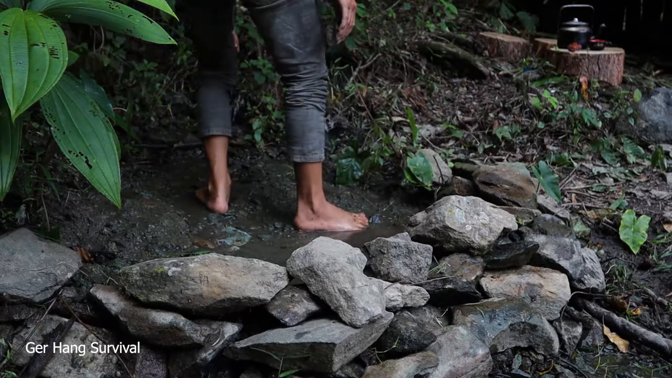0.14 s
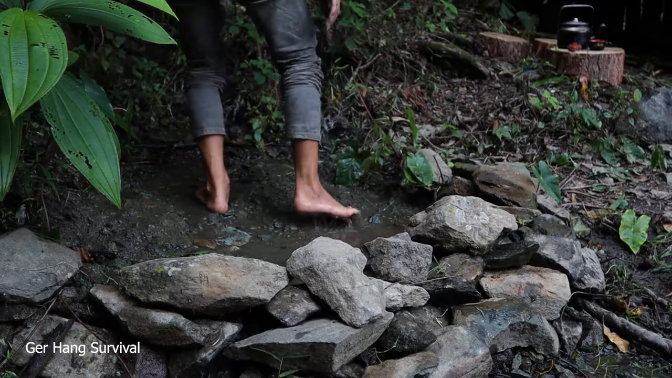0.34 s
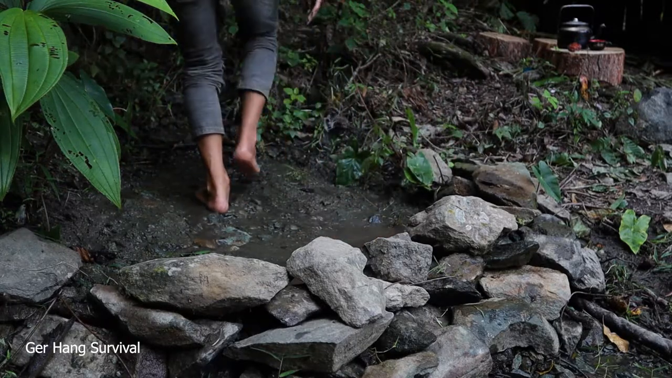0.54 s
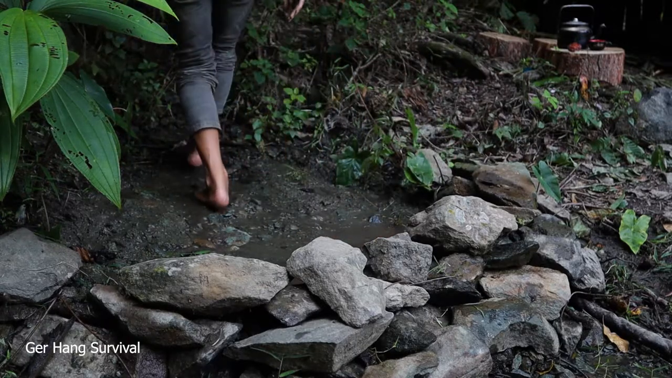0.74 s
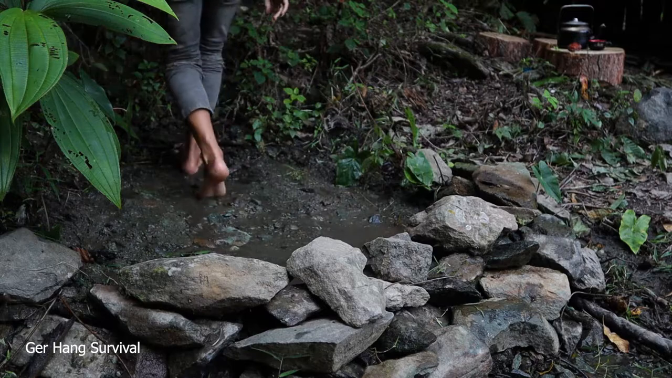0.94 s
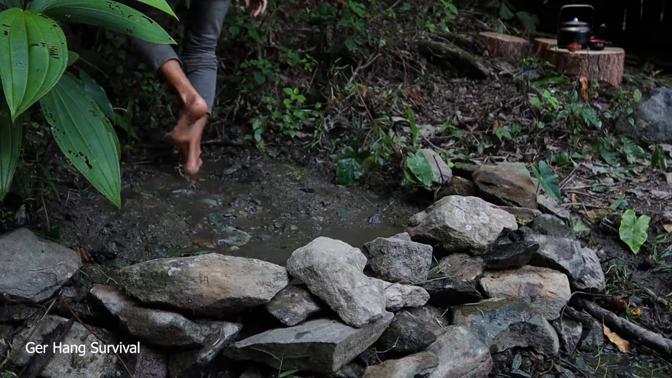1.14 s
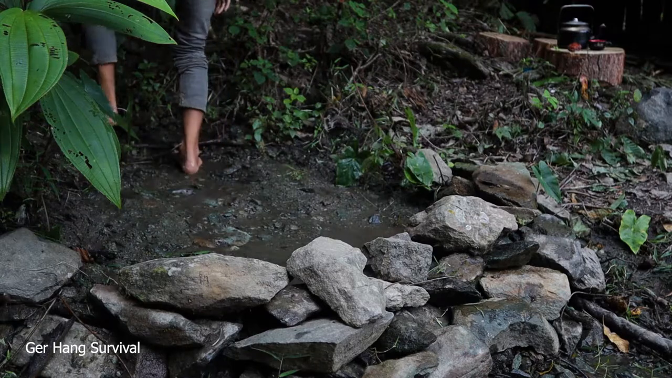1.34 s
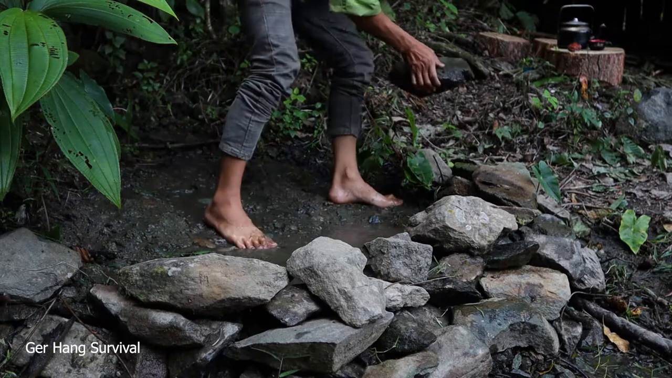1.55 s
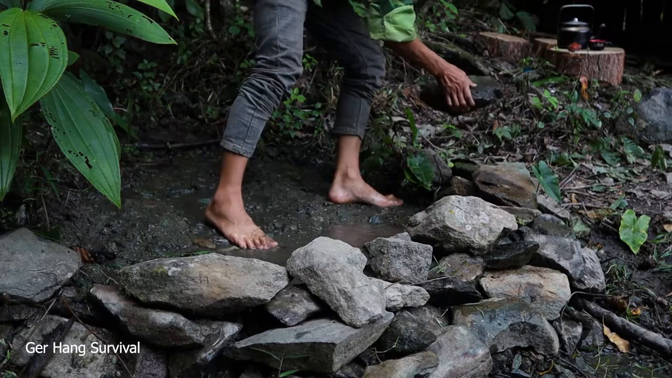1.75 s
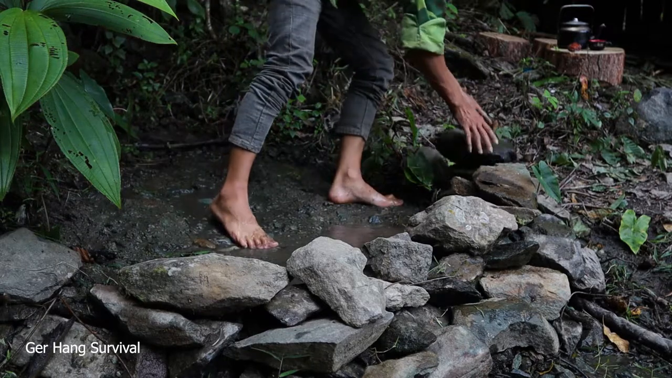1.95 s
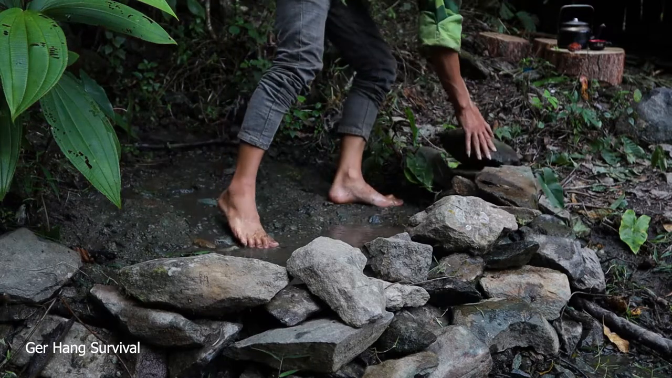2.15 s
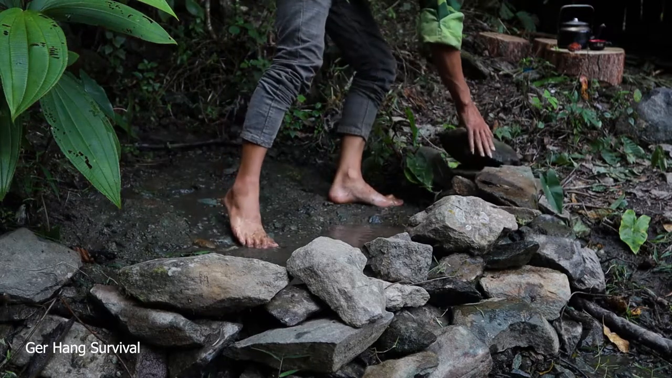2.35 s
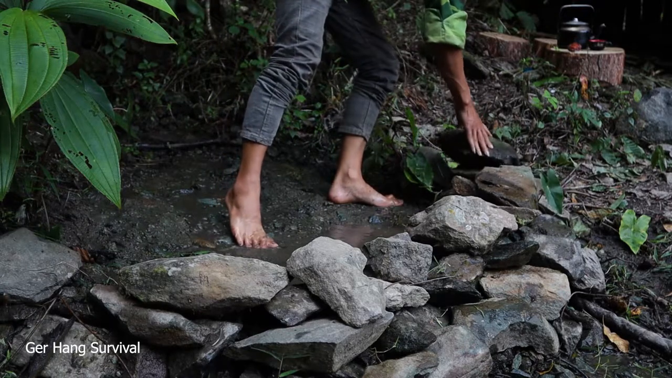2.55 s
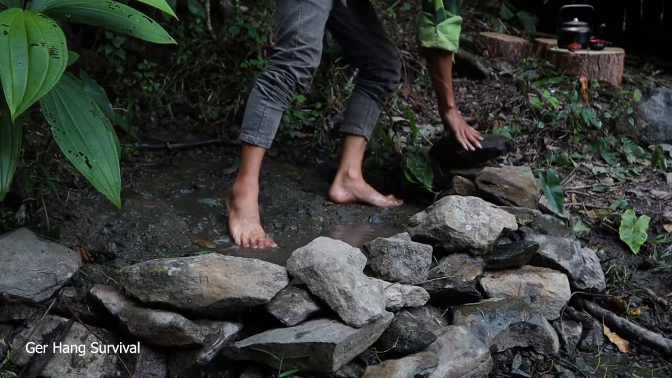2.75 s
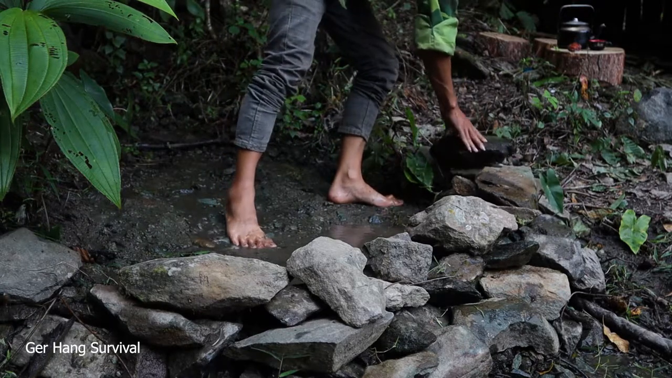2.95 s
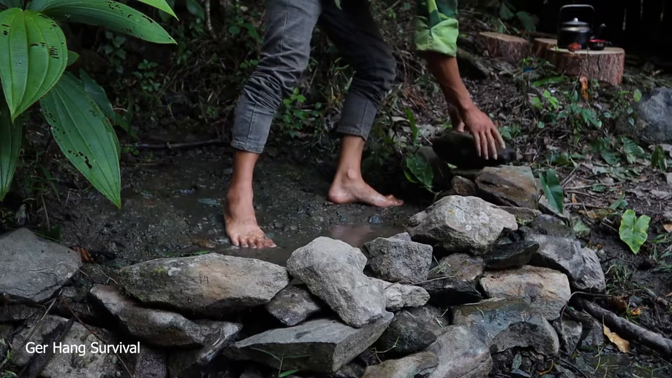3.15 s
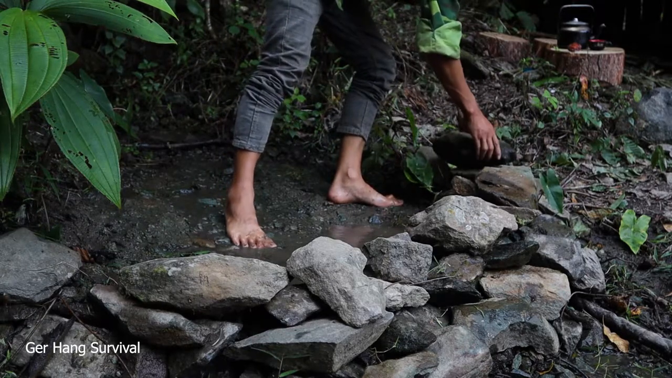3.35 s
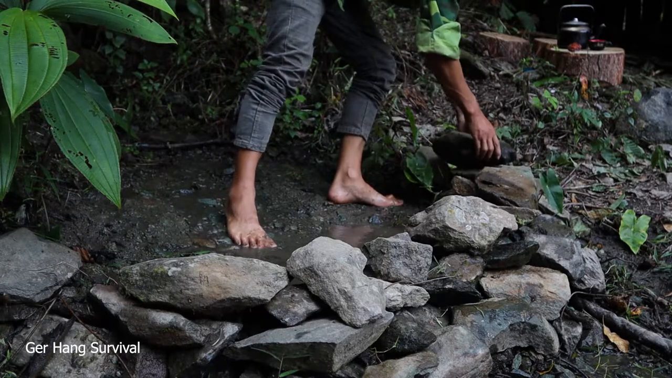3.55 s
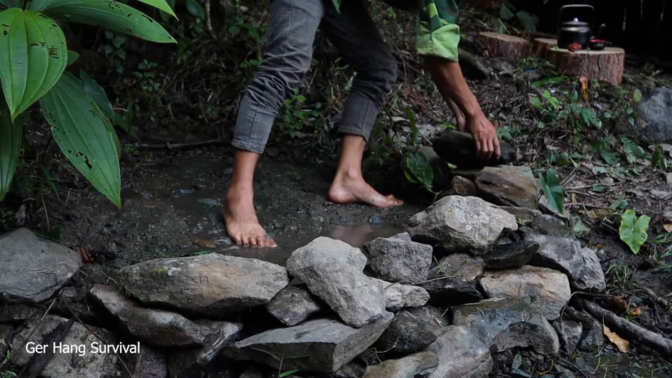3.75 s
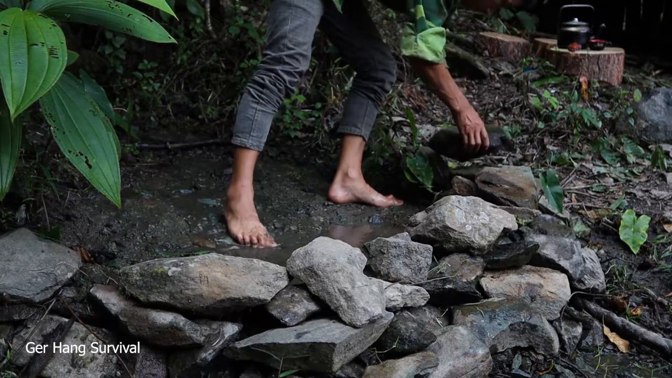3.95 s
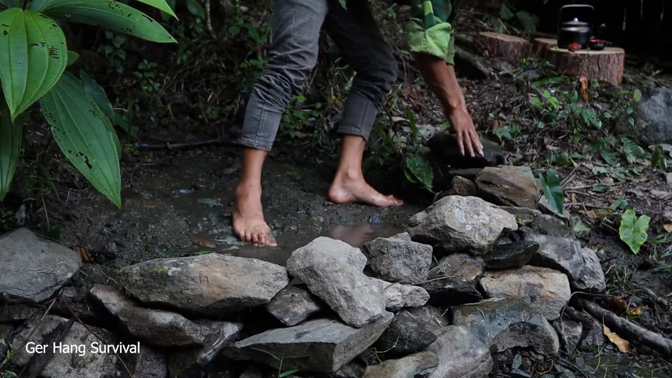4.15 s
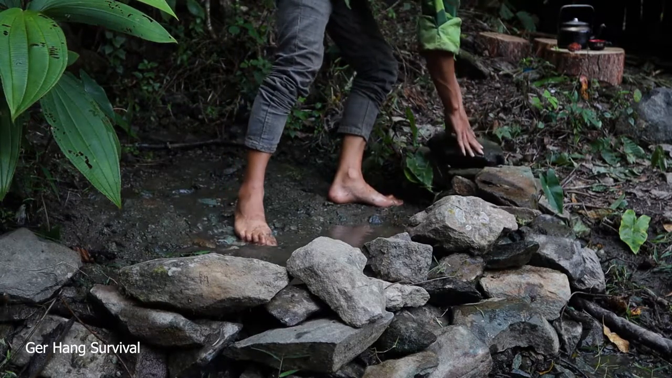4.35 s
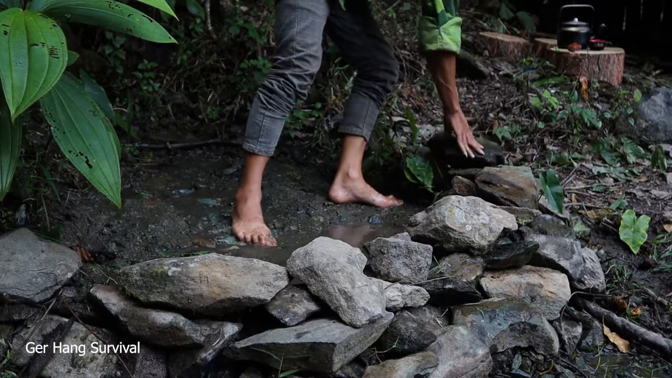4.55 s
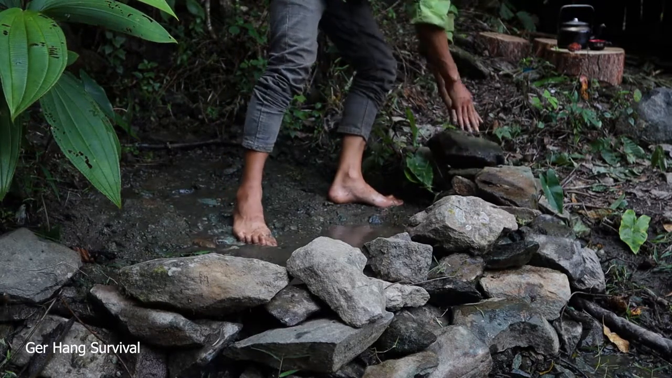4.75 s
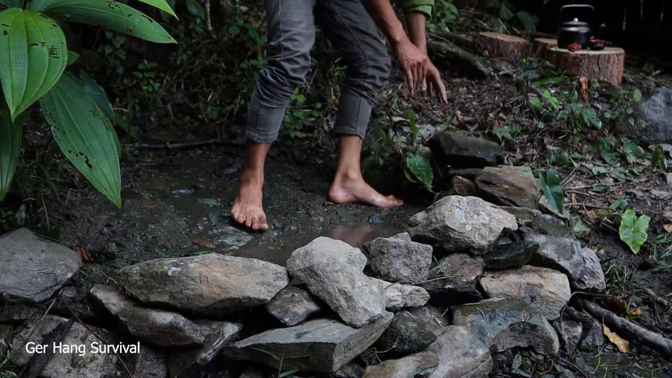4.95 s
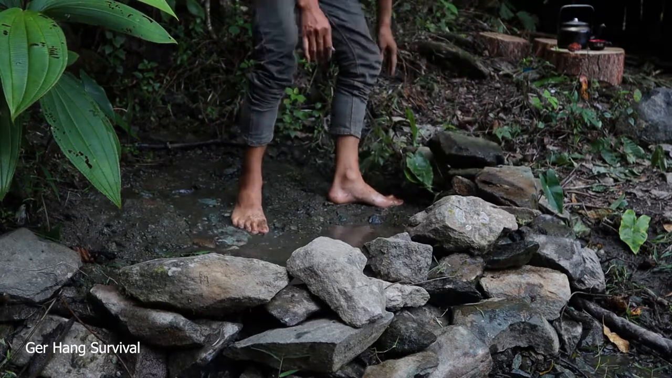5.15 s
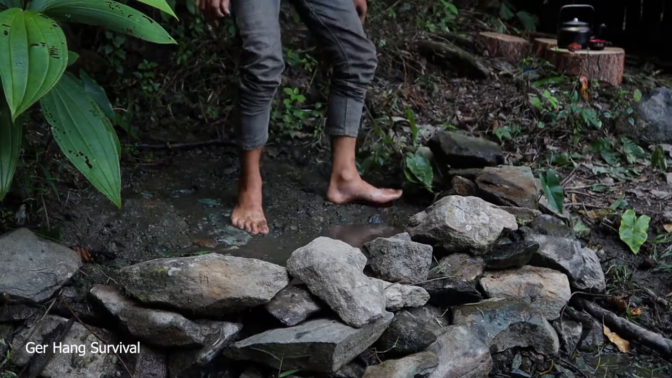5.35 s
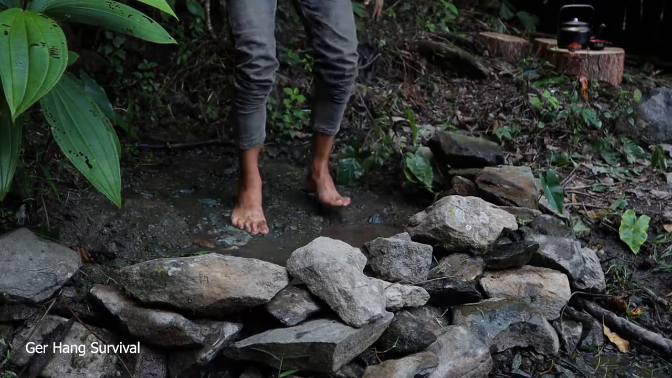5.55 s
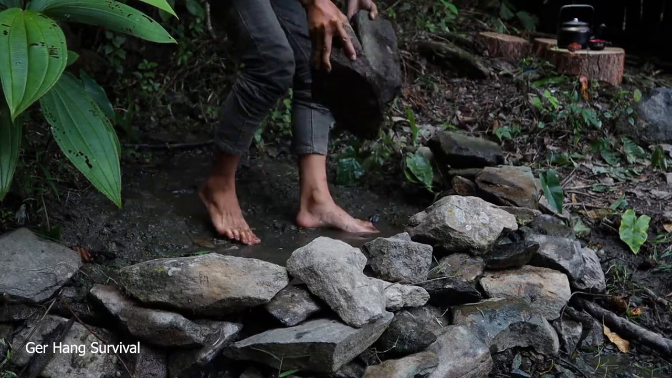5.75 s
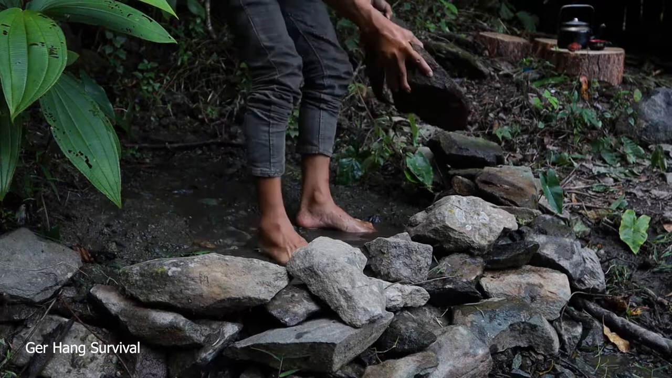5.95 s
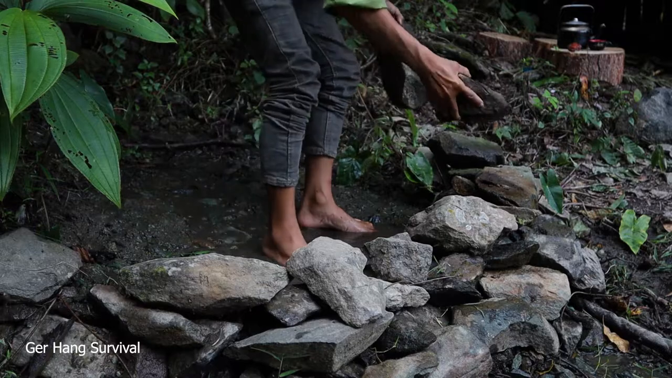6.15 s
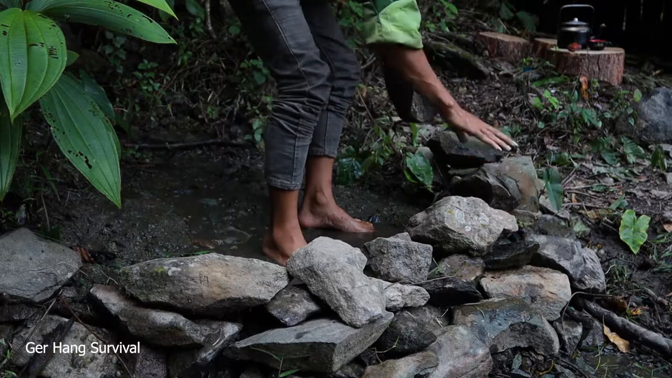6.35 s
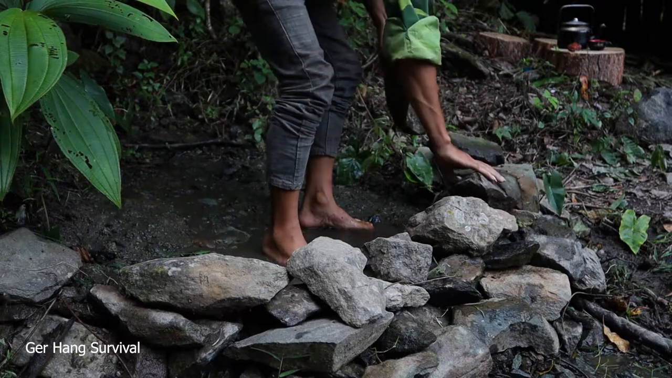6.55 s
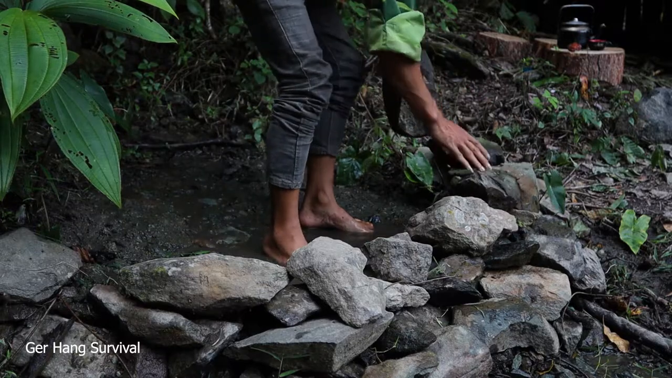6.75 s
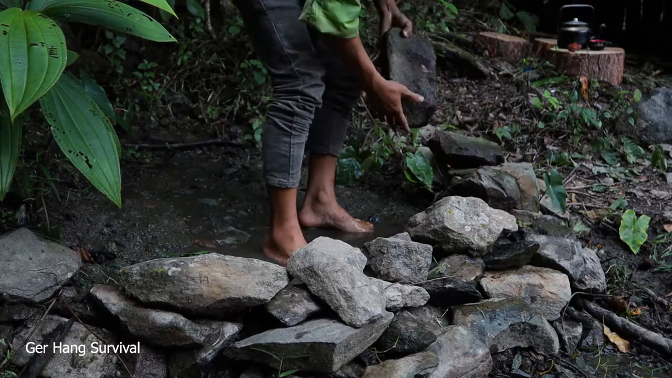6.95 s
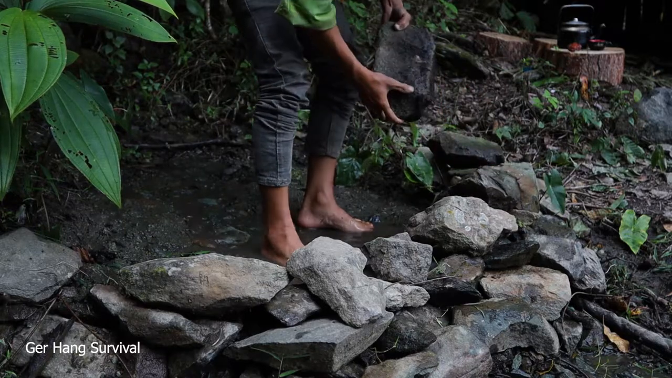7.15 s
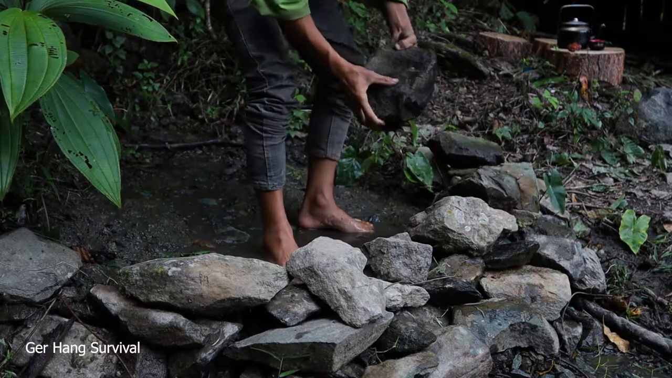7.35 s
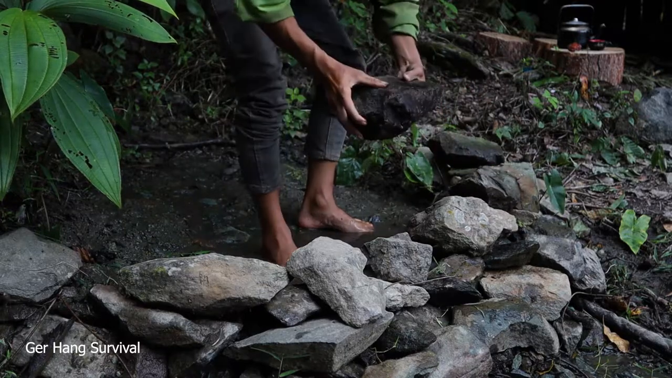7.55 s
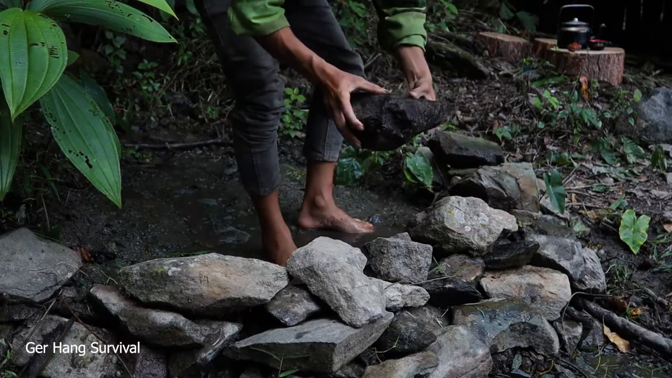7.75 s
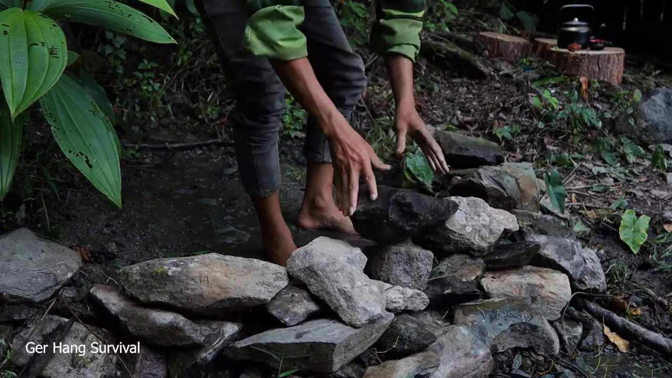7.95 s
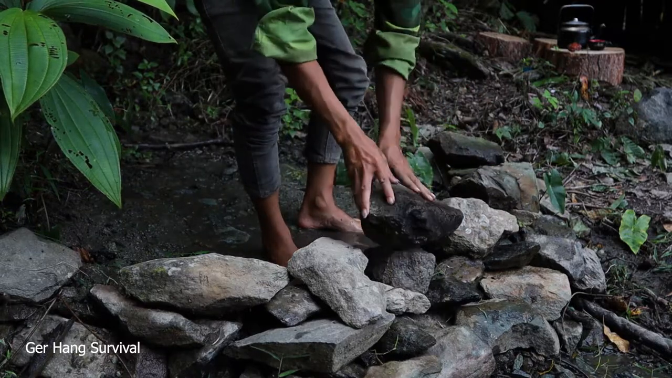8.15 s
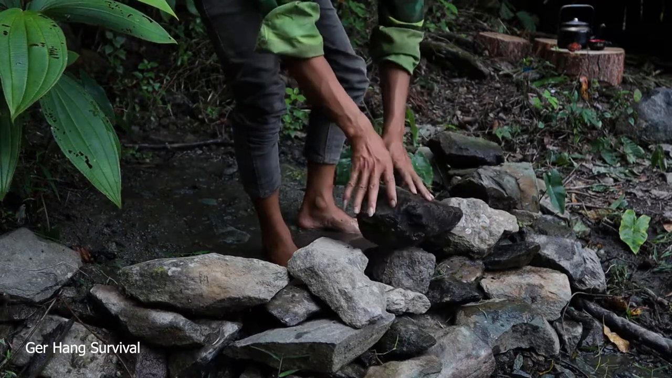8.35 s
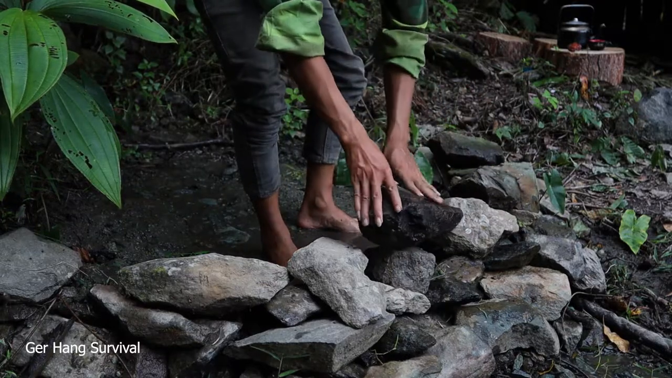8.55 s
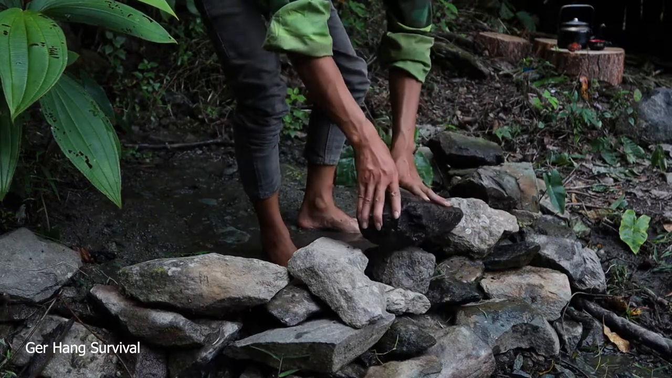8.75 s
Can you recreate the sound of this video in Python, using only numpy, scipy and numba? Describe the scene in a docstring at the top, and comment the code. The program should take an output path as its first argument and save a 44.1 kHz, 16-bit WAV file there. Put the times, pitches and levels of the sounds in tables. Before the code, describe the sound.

Stones are set on a rock pile one at a time, giving three loud, close knocks with crunching grit and small settling taps. Before the first and second, someone steps barefoot through shallow mud, with light splashes, pops and a short run of bubbles. The last two knocks are the hardest and carry a low thump. Faint drips, rustling cloth and buzzing insects fill the quiet forest around them.

```python
"""In a forest, someone wades barefoot through shallow muddy water and sets three stones on a low wall.
Each stone knocks and rocks into place: the impact rings the gaps of the pile, crushes grit and shakes
the ground. Mud squelches in small pops, water drips, bubbles ring and cloth rustles, all with a short
echo from the trees. Leaves and insects hiss all round; the hardest knocks overload the recorder."""
import sys
import numpy as np
from scipy import signal
from scipy.fft import rfft, irfft, next_fast_len
from scipy.io import wavfile
from scipy.ndimage import uniform_filter1d
from numba import njit

SR = 44100
rng = np.random.default_rng(int(sys.argv[2]) if len(sys.argv) > 2 else 0)


def wav_out(sig):
    """Save sig, one row per channel (or a flat mono array), as 16-bit PCM at SR to the path in sys.argv[1]."""
    wavfile.write(sys.argv[1], SR, np.round(np.clip(np.atleast_2d(sig).T, -1, 1) * 32767).astype(np.int16))


N = 388517
T = np.arange(SR // 4) / SR  # the time line of one short sound

# spectrum of fine spray: frequency_hz, level_db
SPRAY_SPECTRUM = [(1500, -14.5), (4000, -21), (8000, 7), (12000, -3), (16000, -32)]
# spectrum of crushed sand: frequency_hz, level_db
GRIT_SPECTRUM = [(500, -28), (1500, 11), (2500, -1), (4000, -6), (5500, -20.5), (8000, -12), (11000, -23.5),
                 (16000, -46)]


def undb(db):
    """Decibels to amplitude gain."""
    return 10 ** (np.asarray(db) / 20)


def fade(t, t60):
    """Exponential decay by 60 dB in t60 seconds."""
    return np.exp(-np.log(1000) * t / t60)


def unit(x):
    """Scale to rms 1."""
    return x / np.sqrt(np.mean(x ** 2))


def peak(x):
    """Scale to peak 1."""
    return x / np.abs(x).max()


def add(track, start_s, sound):
    """Superpose a sound on the track."""
    i = max(int(start_s * SR), 0)
    track[i:i + len(sound)] += sound[:max(N - i, 0)]


def noise(spectrum, size):
    """Noise of rms 1, shaped by (frequency_hz, level_db) points."""
    hz, db = np.transpose(spectrum)
    n = next_fast_len(size)
    bin_hz = np.maximum(np.arange(n // 2 + 1) * SR / n, 1)
    gain = undb(np.interp(np.log(bin_hz), np.log(hz), db))
    return unit(irfft(rfft(rng.standard_normal(n)) * gain, n)[:size])


def band(x, hz, q):
    """Two equal resonators in cascade, for steep skirts."""
    b, a = signal.iirpeak(min(hz, SR / 3), max(q, 1 / 2), fs=SR)
    return signal.lfilter(b, a, signal.lfilter(b, a, x + 1e-18))


def wander(rate_hz):
    """Smooth random modulation of rms 1."""
    hold = int(SR / rate_hz)
    steps = np.repeat(rng.standard_normal(N // hold + 2), hold)
    return unit(uniform_filter1d(steps, hold)[:N])


def crackle(size, spread_db):
    """Log-normal grain sizes, each held for a fraction of a millisecond."""
    grains = undb(spread_db * rng.standard_normal(size // 16 + 1))
    return unit(np.repeat(grains, 16)[:size])


def forest(level_db=-50.92, sway_db=-0.2, flicker_db=1.5, bands=14):
    """Leaves and trickling water add incoherently into a soft wash, each band flickering alone."""
    # spectrum of the wash: frequency_hz, level_db
    wash_spectrum = [(20, -4), (90, -0.5), (200, -0.5), (350, -2.5), (600, -3.5), (1000, -4), (1500, -6),
                     (2100, -7), (2800, -12), (4300, -7), (5400, -12.5), (7500, -11.5), (11000, -16),
                     (16000, -22)]
    wash = rfft(noise(wash_spectrum, N))
    bin_hz = np.arange(len(wash)) * SR / N
    band_position = np.interp(np.log(bin_hz + 1), np.log([80, 12000]), [0, bands - 1])
    out = np.zeros(N)
    for k in range(bands):
        triangle = np.maximum(1 - np.abs(band_position - k), 0)
        out += irfft(wash * triangle, N) * undb(flicker_db * wander(16))
    return out * undb(level_db + sway_db * wander(2.44))


def insect_choirs():
    """Many unsynchronised insects merge into wavering bands of noise."""
    # choirs: pitch_hz, width_hz, level_db, waver_db
    choirs = [(4127, 390, -61, 1), (4590, 470, -63, 3), (6650, 650, -71.5, -2.5)]
    out = np.zeros(N)
    for hz, width_hz, db, waver_db in choirs:
        hiss = unit(band(rng.standard_normal(N), hz, q=hz / width_hz / 0.92))
        out += hiss * undb(db + waver_db * wander(8))
    return out


def trickle(level_db=-71):
    """Water seeping through wet leaves makes granular noise, a fine ticking."""
    return undb(level_db) * noise(SPRAY_SPECTRUM, N) * crackle(N, spread_db=6)


def splash(hz, length_s, spray_db, q=2.16):
    """A burst of tiny pops excites the resonance of a wet hollow, with fine spray above."""
    t = T[:len(T) // 2]
    pops = crackle(len(t), spread_db=4.5) * fade(t, 2 * length_s)
    hollow = band(rng.standard_normal(len(t)) * pops, hz, q)
    spray = noise(SPRAY_SPECTRUM, len(t)) * pops
    return peak(hollow) + undb(spray_db) * peak(spray)


def drips(count=44, softest_db=-50, range_db=11, centre_hz=2600, range_octaves=1.6):
    """Drop impacts at random times make faint, brief splashes."""
    out = np.zeros(N)
    for when, size, pitch in rng.random((count, 3)):
        drip = splash(centre_hz * 2 ** (range_octaves * (pitch - .5)), length_s=0.0077, spray_db=1.5)
        add(out, when * N / SR, undb(softest_db + range_db * size) * drip)
    return out


def mud(pops=7):
    """Mud yields under the pressure of a foot in an uneven run of small pops."""
    # squeezes: start_s, length_s, level_db, pitch_hz
    squelches = [(0.225, 0.048, -44.5, 4000), (1.047, 0.11, -40.5, 4430), (1.139, .09, -42, 2300),
                 (1.463, 0.032, -43.5, 3000), (5.275, 0.19, -46.5, 2650), (6.041, .09, -35.5, 3570),
                 (6.202, .11, -32.5, 2740)]
    out = np.zeros(N)
    for start_s, length_s, db, hz in squelches:
        for k, (late, pitch) in enumerate(rng.random((pops, 2))):
            pop = splash(hz * 2 ** (pitch - .5), length_s=0.028, spray_db=-6.5)
            add(out, start_s + length_s * (k + late) / pops, undb(db) * pop)
    return out


def rustles(flutter_db=3.2):
    """Friction of trouser cloth and hands swishes in uneven swells as the body bends and turns."""
    # brushing movements: centre_s, level_db, length_s
    brushes = [(1.106, -55, 1), (5.288, -54.5, 0.39), (5.854, -56.5, 0.24), (7.502, -57, 0.54)]
    # spectrum of rubbed cloth: frequency_hz, level_db
    cloth_spectrum = [(100, -3), (350, 4.5), (800, 1.5), (1700, 2), (3000, -3.5), (8000, -22.5),
                      (16000, -26)]
    t = np.arange(N) / SR
    swells = sum(undb(db) * np.exp(-(2 * (t - centre_s) / length_s) ** 2)
                 for centre_s, db, length_s in brushes)
    return noise(cloth_spectrum, N) * swells * undb(flutter_db * wander(45))


def cricket(hz=7330, width_hz=200, level_db=-70, pulse_db=6, period_s=0.268, start_s=0.82, stop_s=4.3):
    """One cricket trills for a while: a narrow band of noise under periodic amplitude modulation."""
    t = np.arange(N) / SR
    pulse = np.cos(2 * np.pi * (t - 3.42) / period_s)  # one crest falls at 3.42 s
    envelope = undb(level_db + pulse_db * pulse + wander(8.4)) * (t > start_s) * (t < stop_s)
    return envelope * unit(band(rng.standard_normal(N), hz, hz / width_hz))


def slaps():
    """Impacts of feet, mud and drops splash the water; longer slaps throw more spray."""
    # wet impacts: start_s, level_db, pitch_hz, length_s
    impacts = [(0.862, -28, 4700, .01), (0.87, -23.5, 3200, 0.05), (1.037, -21, 3250, 0.0069),
               (1.127, -30, 1490, 0.015), (1.145, -23.5, 2420, 0.0055), (1.21, -34.5, 3000, .008),
               (1.246, -32, 3300, 0.024), (4.916, -29, 1850, 0.066), (5.082, -32, 4500, .012),
               (5.09, -26.5, 3700, 0.036), (5.876, -32, 3600, .012), (6.0418, -26.5, 4030, 0.0092),
               (6.055, -27, 3260, 0.03), (6.0704, -22.5, 3330, 0.02), (6.0713, -24, 1370, .007),
               (6.2336, -26, 1510, 0.0078), (6.2345, -25.5, 3450, 0.017), (6.582, -30, 3930, 0.0052)]
    out = np.zeros(N)
    for start_s, db, hz, length_s in impacts:
        spray_db = -10 + 0.5 * np.log2(length_s / 0.016)
        add(out, start_s, undb(db) * splash(hz, length_s, spray_db))
    return out


def near_insect(hz=4900, width_hz=330, level_db=-59, period_s=0.172, flutter_db=2.5):
    """A nearer insect buzzes: narrow-band noise modulated into phrases of evenly spaced chirps."""
    # phrases: start_s, end_s
    phrases = [(1.42, 2.2), (3.05, 3.4), (4.47, 5.16), (5.56, 6.9), (6.96, 7.48), (8.43, 8.8)]
    t = np.arange(N) / SR
    chirps = sum(np.sin(np.pi * (t - start_s) / period_s) ** 2 * (t > start_s) * (t < end_s)
                 for start_s, end_s in phrases)
    buzz = unit(band(rng.standard_normal(N), hz, hz / width_hz))
    return buzz * chirps * undb(level_db + flutter_db * wander(13))


def grinding(slip_db=6.5, edge_s=0.011):
    """Stick-slip friction: sand crunches unevenly for as long as a settling stone slides."""
    # slides: start_s, length_s, level_db
    slides = [(2.017, 0.045, -31.5), (4.182, 0.022, -35)]
    out = np.zeros(N)
    for start_s, length_s, db in slides:
        sliding = (1 - fade(T, edge_s)) * fade(np.maximum(T - length_s, 0), edge_s)
        crunch = noise(GRIT_SPECTRUM, len(T)) * crackle(len(T), slip_db)
        add(out, start_s, undb(db) * sliding * crunch)
    return out


def contacts(edge_lead_s=0.001002, edge_db=-19.5, edge_hz=1870, rebound_s=.0105, rebound_db=-25):
    """A knock is three collisions: a sharp edge touches, the face lands, the stone rocks back once."""
    # stone on stone: start_s, level_db, pitch_hz, pile_db, thud_db (the last two relative to the contact)
    knocks = [(2.0205, 0, 557, 9, -13), (2.032, -9, 516, 0, -8), (2.0359, 0, 636, 10, -16.5),
              (2.0392, -7, 880, 2, -25), (2.0533, -8, 765, -2, -27), (2.063, -20, 710, 1, -6),
              (2.1164, -25, 630, -9, -12), (2.777, -35, 550, -5, -18), (2.824, -35, 1070, -6, -20),
              (2.863, -31, 273, -22, -3), (4.1453, -13.5, 250, -10, -16), (4.1469, -11.5, 780, -10, -34),
              (4.1876, -12.5, 288, -3, -5.5), (4.1886, -11.5, 600, -9, -17), (6.3937, 3.5, 905, 20, -24.5),
              (6.398, 3, 707, 16, -23.5), (7.45, -40, 650, -3, -15), (8.030, 4, 1195, -18, -45),
              (8.0315, 5.5, 737, -19.5, -16.5), (8.116, -23.5, 1600, -22, -10),
              (8.203, -37.5, 237, -3.5, 6), (8.464, -32, 317, -6, -8), (8.62, -35, 400, -9.5, -14)]
    for start_s, db, hz, pile_db, thud_db in knocks:
        yield start_s - edge_lead_s, db + edge_db, edge_hz, pile_db, thud_db
        yield start_s, db, hz, pile_db, thud_db
        yield start_s + rebound_s, db + rebound_db, hz * 1.35, pile_db, thud_db


def stones(ring_db=-30, scatter_db=-24, grit_db=-24, hardness_hz=2500):
    """Each impact excites the damped modes of the pile, scatters off other stones and crushes sand."""
    # modes of the hollows and stones of the pile: pitch_hz, level_db, t60_s
    pile_modes = [(167, 7, 0.14), (229, 4.5, 0.069), (277, 14.5, 0.045), (333.5, 11, 0.05),
                  (383.5, 11, 0.05), (466, -9.5, 0.15), (558, 2, 0.048), (595, 6.5, 0.022),
                  (753, -6, 0.076), (807, 4.5, 0.037), (919, 7.5, 0.038), (1017, 0.5, 0.058),
                  (1171, 15.5, 0.031), (1210, -0.5, 0.086), (1430, -39, 0.076), (1620, -7, .035),
                  (2140, 21, 0.01), (2400, -16, 0.026), (2920, 3, 0.035), (2880, -5, .03)]
    ring = sum(undb(db) * np.cos(2 * np.pi * hz * T) * fade(T, t60) for hz, db, t60 in pile_modes)
    jolt = signal.unit_impulse(len(T))
    softening = signal.butter(2, hardness_hz, fs=SR)  # the contact is never perfectly hard
    thud = peak(band(jolt, hz=165, q=0.54))  # the wall gives on its bed of mud
    out = np.zeros(N)
    for start_s, db, hz, pile_db, thud_db in contacts():
        scatter = rng.standard_normal(len(T)) * fade(T, 0.15) * (1 - fade(T, 0.0051))
        pile = undb(ring_db) * ring + undb(scatter_db) * scatter
        body = signal.lfilter(*softening, band(jolt + undb(pile_db) * pile, hz, q=1.24))
        body /= np.sqrt(np.sum(body ** 2) / (0.00089 * SR))  # the energy of 0.89 ms at rms 1
        crushing = fade(T, 0.064) * (1 - fade(T, .002))
        grit = noise(GRIT_SPECTRUM, len(T)) * crackle(len(T), spread_db=2.5) * crushing
        add(out, start_s, undb(db) * (body + undb(grit_db) * grit + undb(thud_db) * thud))
    return out


def tremors(hz=52, t60=0.56, travel_s=0.029, rise_s=0.028, q=0.68):
    """A slow wave in the soft ground arrives late and sets the microphone stand swaying."""
    # weight landing on the wall: start_s, peak_db
    landings = [(2.02, -41), (4.187, -51), (6.393, -28), (8.028, -34.5), (8.464, -48.5)]
    out, t = np.zeros(N), np.arange(SR) / SR
    sway = np.sin(2 * np.pi * hz * t) * fade(t, t60) * (1 - fade(t, rise_s))
    sway = peak(signal.lfilter(*signal.iirpeak(hz, q, fs=SR), sway))
    for start_s, db in landings:
        add(out, start_s + travel_s, undb(db) * sway)
    return out


def bubbles(t60=0.079, onset_s=0.0028, churn=0.5):
    """Trapped air resonates, its pitch climbing as it nears the surface, jostled by the churning mud."""
    # air pockets closing in the water: start_s, peak_db, start_pitch_hz
    air_pockets = [(3.313, -38.5, 874), (6.152, -29.5, 1520), (6.164, -27.5, 1127), (6.207, -20, 700),
                   (6.2338, -25, 534), (6.2338, -23, 1210), (6.24, -17.5, 844), (6.269, -24.5, 677),
                   (6.295, -27, 1720), (6.325, -30, 1960)]
    out = np.zeros(N)
    for start_s, db, hz in air_pockets:
        octaves_per_s = 13.1 * (798 / hz) ** 2.22  # big, low bubbles climb fastest
        pitch_hz = hz * 2 ** (octaves_per_s * np.minimum(T, t60 / 2))
        jostle = unit(uniform_filter1d(rng.standard_normal((2, len(T))), size=70, axis=1))
        ring = np.exp(2j * np.pi * np.cumsum(pitch_hz) / SR) * (1 + churn * (jostle[0] + 1j * jostle[1]))
        envelope = fade(T, t60) * (1 - fade(T, onset_s))
        add(out, start_s, undb(db) * peak(ring.imag * envelope))
    return out


def crumbs(rise_s=0.27):
    """Granular flow: loosened soil runs down through the wall after a heavy landing."""
    # falls of soil: start_s, level_db, t60_s
    falls = [(6.405, -41, 0.43), (8.048, -35.5, 0.47)]
    # spectrum of running soil: frequency_hz, level_db
    soil_spectrum = [(100, -3), (400, -5), (1300, 0.5), (2300, -5), (4000, -16.5), (7000, -26),
                     (16000, -62)]
    out, t = np.zeros(N), np.arange(SR // 2) / SR
    for start_s, db, t60 in falls:
        flow = peak(fade(t, t60) * (1 - fade(t, rise_s)))
        add(out, start_s, undb(db) * flow * noise(soil_spectrum, len(t)))
    return out


def tree_echo(x, echo_db=-26, t60=0.63, build_s=0.13):
    """Scattering by countless trunks and leaves gives a toneless echo that builds and dies quickly."""
    # spectrum of the echo: frequency_hz, level_db
    echo_spectrum = [(60, -20), (200, -6), (400, -2), (700, -0.5), (1250, 1), (1700, -9.5), (2500, -17),
                     (4000, -12), (8000, -22), (16000, -60)]
    t = np.arange(SR) / SR
    returns = (fade(t, t60) * (1 - fade(t, build_s))) ** 2  # scattered paths add in power
    power = np.abs(signal.fftconvolve(x ** 2, returns / returns.sum())[:N])
    return undb(echo_db) * np.sqrt(power) * noise(echo_spectrum, N) * crackle(N, spread_db=2)


def scene():
    """Superposition in one channel: stones and water close by, their echo, the forest all round."""
    around = forest() + insect_choirs() + near_insect() + cricket() + trickle()
    near = stones() + grinding() + crumbs() + slaps() + bubbles() + drips() + rustles() + mud()
    return (near + tree_echo(near) + tremors() + around)[None]


@njit
def follow(x, release):
    """Peak detection: instant rise, exponential fall."""
    out, held = np.empty(len(x)), 0.
    for i in range(len(x)):
        held = max(x[i], held * release)
        out[i] = held
    return out


def record(dry, knee_db=-3, release_s=0.48, squeeze=0.49, lag_s=0.007, hardness=24, top_hz=15900):
    """A lagging gain control ducks after loud knocks; peaks that pass clip; a low-pass cuts the top."""
    held = follow(np.abs(dry[0]), np.exp(-1 / (release_s * SR)))
    excess = np.log(np.maximum(held / undb(knee_db), 1))
    pole = np.exp(-1 / (lag_s * SR))
    ducked = dry * np.exp(-squeeze * signal.lfilter([1 - pole], [1, -pole], excess))
    clipped = ducked / (1 + np.abs(ducked) ** hardness) ** (1 / hardness)  # flat tops, rounded corners
    return signal.sosfilt(signal.ellip(10, .2, 80, top_hz, fs=SR, output="sos"), clipped)


dry = scene()
out = record(dry)
wav_out(out)
```